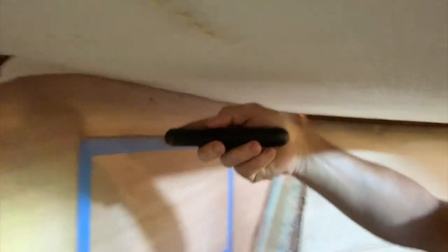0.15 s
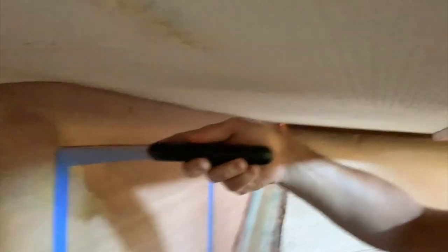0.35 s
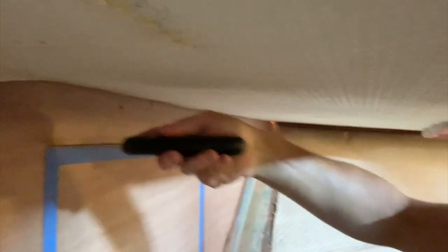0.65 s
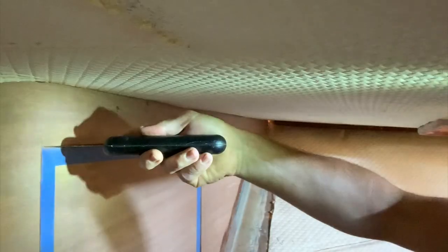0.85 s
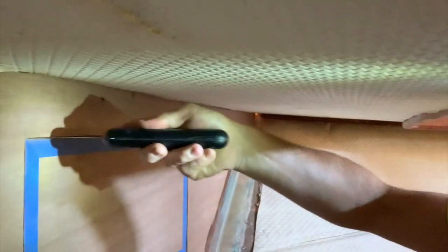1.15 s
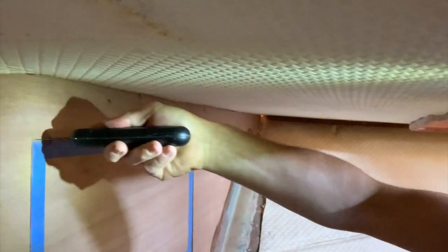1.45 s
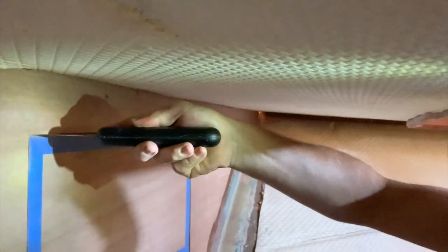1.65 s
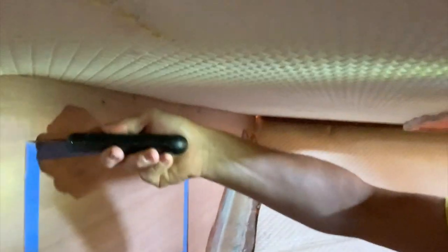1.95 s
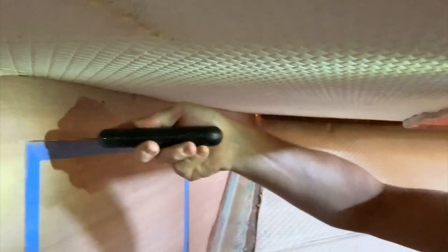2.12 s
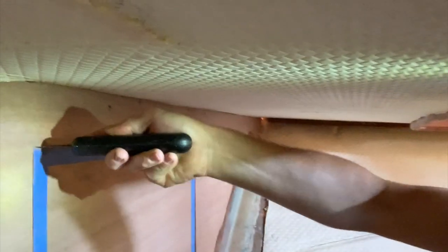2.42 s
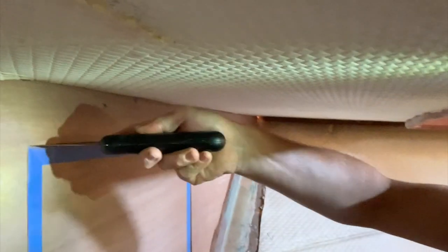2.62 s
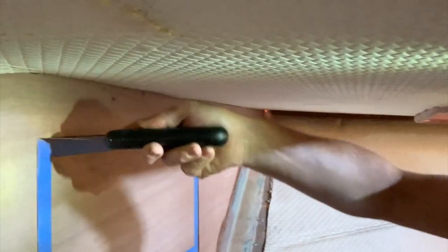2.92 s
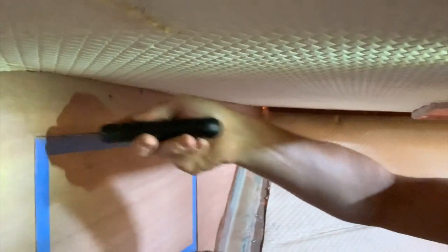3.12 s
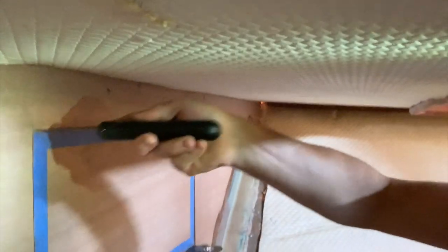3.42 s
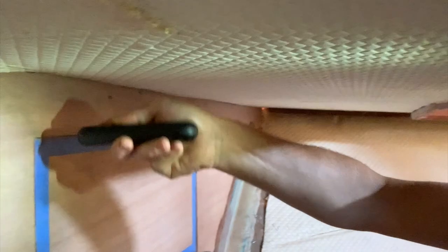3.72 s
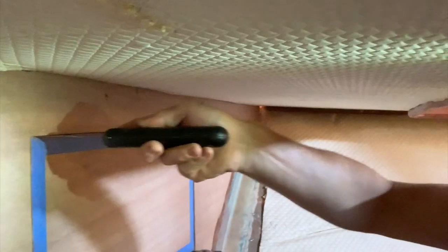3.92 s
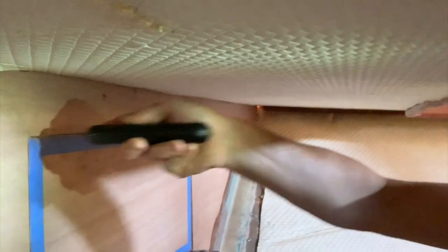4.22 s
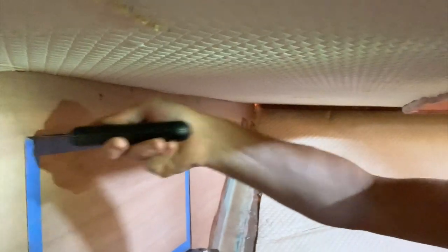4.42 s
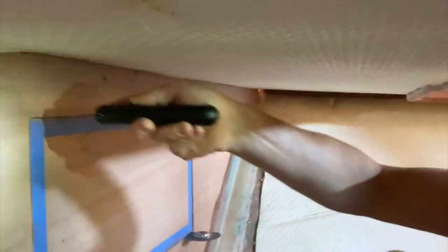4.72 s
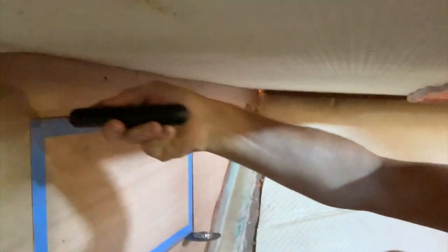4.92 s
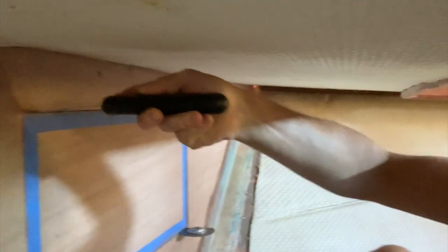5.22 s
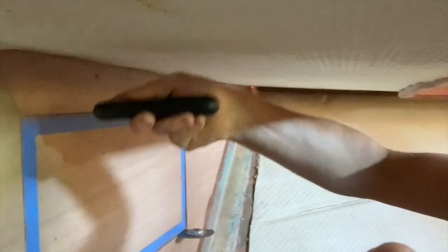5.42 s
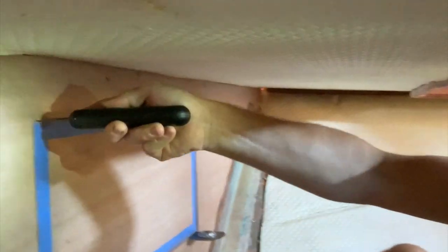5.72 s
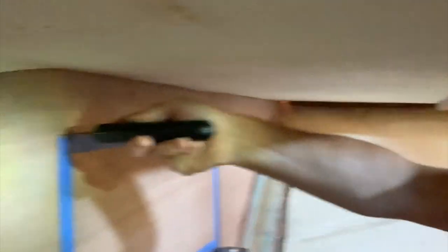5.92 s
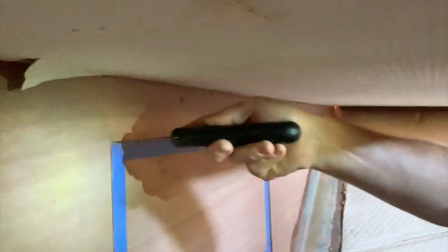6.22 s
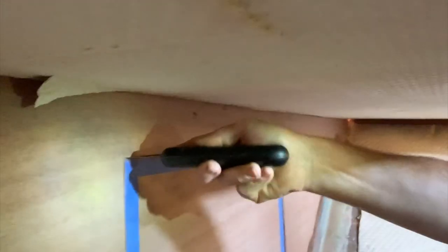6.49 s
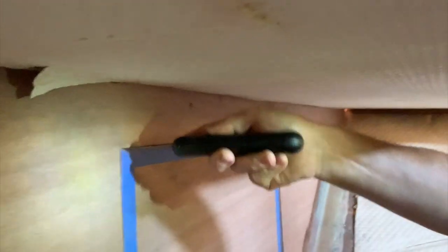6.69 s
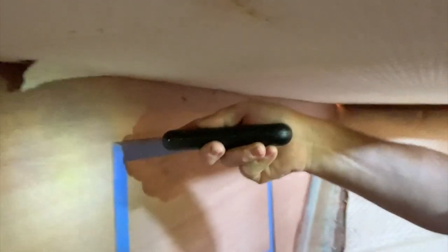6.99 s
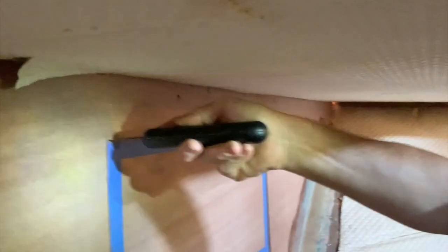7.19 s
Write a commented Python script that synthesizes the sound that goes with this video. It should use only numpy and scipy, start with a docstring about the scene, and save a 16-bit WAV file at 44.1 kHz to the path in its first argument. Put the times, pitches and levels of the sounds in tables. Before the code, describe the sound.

Close, dry sound of sawing wood by hand: soft tentative rubs first, then steady strokes about four or five a second, each a grainy burst of tooth knocks and torn fibres making the panel boom. There is a short gap with a small tick, a denser rapid run, a weaker slow drag, then firm strokes again. Uneven bass rumble and faint background noise lie beneath, with very short cabin reflections.

```python
"""A low hull hum over a faint noise floor, then a hand saw working to and fro through a cabin's wooden bulkhead.
The hum is a wandering sine that jolts of the arm swell. Passing teeth knock the wood at a rate that follows
the blade's speed and ring the panel's modes; torn fibres rasp and the blade hisses, both as shaped noise.
Friction dips as the blade sticks and leaps as it lets go; small contacts tick and some turns of the blade squeal."""
import sys
import numpy as np
from scipy import signal
from scipy.fft import rfft, irfft
from scipy.io import wavfile
from scipy.ndimage import uniform_filter1d

SR = 44100
rng = np.random.default_rng(int(sys.argv[2]) if len(sys.argv) > 2 else 0)


def unload_wav(signal):
    """Save mono or channel-first audio to the path in sys.argv[1] as 16-bit WAV at rate SR, clipped to [-1, 1]."""
    wavfile.write(
        sys.argv[1],
        SR,
        np.round(np.clip(np.atleast_2d(signal).T, -1, 1) * 32767).astype(np.int16),
    )


def natural_amplitude(level_db):
    """Convert a level in decibels to a linear amplitude factor, elementwise."""
    exponent = np.asarray(level_db, float) / 20
    return 10 ** exponent


N = 324135

# The saw strokes. Each row: start in seconds, hardest point in seconds, end in seconds, top tooth rate in Hz
# before wobble, rasp level in dB, tooth knock level in dB; both levels before the fades at the turns.
STROKE_TABLE = [(0.063, 0.225, 0.3, 109.6, -35.0, -27.5), (0.493, 0.583, 0.74, 124.9, -43.5, -33.5),
                (0.627, 0.756, 0.91, 124.9, -43.5, -29), (0.876, 1.041, 1.17, 399.9, -41, -28),
                (1.129, 1.371, 1.567, 189.8, -37.5, -20), (1.506, 1.607, 1.718, 219.7, -22.5, -13),
                (1.713, 1.87, 1.958, 225.0, -32, -13.5), (1.994, 2.029, 2.214, 259.7, -25, -13),
                (2.183, 2.397, 2.505, 210.8, -33.5, -15.5), (2.466, 2.552, 2.686, 239.3, -24.5, -14),
                (2.674, 2.724, 2.93, 89.8, -49, -35), (2.986, 3.011, 3.11, 109.6, -32, -20),
                (3.125, 3.17, 3.345, 301.2, -29.5, -13), (3.354, 3.428, 3.562, 229.8, -26.3, -14.9),
                (3.559, 3.581, 3.776, 261.0, -29, -15), (3.766, 3.813, 3.97, 279.9, -25.5, -15),
                (3.956, 4.104, 4.194, 340.0, -27.5, -18), (4.189, 4.264, 4.381, 359.0, -22.5, -10.5),
                (4.38, 4.437, 4.548, 387.5, -24.5, -10.5), (4.571, 4.655, 4.735, 200.1, -20.5, -10.5),
                (4.746, 4.845, 4.97, 188.8, -28.9, -16.5), (4.95, 5.028, 5.19, 211.1, -25.5, -17.1),
                (5.272, 5.306, 5.326, 90.1, -23, -23), (5.381, 5.67, 5.91, 159.9, -38, -20.5),
                (5.927, 6.011, 6.247, 394.0, -35, -17.5), (6.228, 6.368, 6.49, 238.5, -32.5, -16),
                (6.53, 6.564, 6.725, 194.7, -26.5, -10), (6.723, 6.827, 6.905, 261.0, -28.5, -13.5),
                (6.935, 7.007, 7.134, 240.1, -26, -12.5), (7.13, 7.19, 7.306, 230.3, -28.5, -11.7),
                (7.326, 7.359, 7.492, 240.6, -14, -5.5)]


def rms_one(x):
    """Scale to unit rms."""
    return x / np.sqrt(np.mean(x ** 2) + 1e-20)


def drift(rate_hz):
    """Slow random movement, spread 1: white noise through two equal one-pole lowpasses."""
    r = np.exp(-2 * np.pi * rate_hz / SR)
    settled = signal.lfilter([1], [1, -2 * r, r * r], rng.standard_normal(N + SR))[SR:]
    return rms_one(settled)


def coloured(x, spectrum):
    """Shape a noise with a spectrum drawn in dB over log frequency; rms 1."""
    hz, db = np.transpose(spectrum)
    grid_hz = np.maximum(np.arange(N // 2 + 1) * SR / N, 1)
    gain_db = np.interp(np.log(grid_hz), np.log(hz), db, left=-90, right=-90)
    return rms_one(irfft(rfft(x) * natural_amplitude(gain_db), N))


def resonance(x, hz, width_hz):
    """Two-pole resonance, gain 1 on top."""
    r = np.exp(-np.pi * width_hz / SR)
    feedback = [1, -2 * r * np.cos(2 * np.pi * hz / SR), r * r]
    return signal.lfilter(np.array([1, 0, -1]) * (1 - r * r) / 2, feedback, x)


def background():
    """A faint steady noise floor, heaviest in the bass."""
    # Spectrum of the floor. Each row: frequency in Hz, relative density in dB per Hz.
    floor_spectrum = [(47, -26), (80, 9), (409, -34), (477, -34), (2980, -41), (5640, -57), (12200, -50),
                      (15600, -67)]
    floor_db = -45
    return natural_amplitude(floor_db) * coloured(rng.standard_normal(N), floor_spectrum)


def boom(boom_hz=50.6, hum_db=-41.5, wander=0.2, lumpy_db=3.0):
    """The hull hums low all the time, its pitch wandering and its level uneven; each jolt swells it."""
    # The arm's jolts, which shake the hull. Each row: time of the peak in seconds, swell in dB before lumpiness.
    jolts = [(.15, -33.5), (.26, -28.5), (.62, -33), (.84, -29.5), (1.08, -33), (1.31, -31), (1.56, -20.5),
             (1.69, -21), (1.88, -29), (2.03, -29), (2.27, -27), (2.52, -24), (2.67, -23.5), (2.77, -26.5),
             (3.07, -20.5), (3.32, -26.5), (3.57, -23.5), (3.73, -23.5), (3.93, -22), (4.05, -26),
             (4.36, -24), (4.55, -33), (4.74, -29), (4.9, -28), (5.09, -23), (5.29, -29.5), (5.45, -27.5),
             (5.6, -25), (5.72, -32), (5.87, -27), (5.98, -26), (6.16, -33), (6.32, -29), (6.47, -25),
             (6.59, -25), (6.9, -25.5), (7.11, -28), (7.28, -28)]
    rise_s, fall_s = 0.037, 0.049
    t = np.arange(0, N + 64, 64) / SR
    s, db = np.transpose(jolts)[:, :, None]
    swells = natural_amplitude(db) * np.exp(-((t - s) / np.where(t < s, rise_s, fall_s)) ** 2)
    level = np.interp(np.arange(N) / SR, t, natural_amplitude(hum_db) + swells.sum(axis=0))
    phase = 2 * np.pi * np.cumsum(boom_hz * (1 + wander * drift(8.98))) / SR
    return level * natural_amplitude(lumpy_db * drift(28)) * np.sqrt(2) * np.sin(phase)


def panel(force):
    """The bulkhead answers a force with all its modes, in alternating polarity."""
    # Modes of the wood. Each row: frequency in Hz, bandwidth in Hz, gain in dB.
    modes = [(68.6, 31, -13.5), (102.3, 19.5, -2.5), (120, 19.4, -1), (182.2, 9.4, 1), (229.2, 13.8, -2.5),
             (290, 15.3, -6.5), (331.4, 13.1, -3), (389, 23.5, -7.5), (412.2, 24, -14), (491, 24, -17.5),
             (525.7, 12.6, -14.5), (621.5, 13.7, -19), (680, 32, -40.5), (781, 22, -21), (852.8, 12, -25),
             (1048, 26, -23.5), (1142, 26, -23.5), (1266, 41, -26), (1482, 38, -24.5), (1723, 57, -28.5),
             (1883, 38, -32), (2240, 60, -52), (2437, 76, -26.5), (2972, 90, -26), (3743, 68, -29.5),
             (4064, 130, -32), (4640, 160, -34)]
    ringing = 0
    for k, (hz, width_hz, db) in enumerate(modes):
        ringing = ringing + (-1) ** k * natural_amplitude(db) * resonance(force, hz, width_hz)
    return ringing


def stroke_motion(roundness=.6, creep_hz=35):
    """The arm speeds the blade up and slows it down in every stroke: tooth rate in Hz and knock sharpness."""
    fastest_at = .45   # share of the stroke gone when the blade is fastest
    sharpness_at_250_hz, sharper_per_hz = 0.36, 0.0031   # faster teeth knock sharper
    t, rate = np.arange(N) / SR, np.full(N, float(creep_hz))
    for start, _, end, top_hz, *_ in STROKE_TABLE:
        fastest = start + fastest_at * (end - start)
        turn = np.interp(t, [start, fastest, end], [0, np.pi / 2, np.pi])
        rate = np.maximum(rate, top_hz * np.abs(np.sin(turn)) ** roundness)
    return rate, np.clip(sharpness_at_250_hz + sharper_per_hz * (rate - 250), 0, 1)


def stroke_levels():
    """Every stroke fades in after the turn, leans to its hardest point and fades out: rasp and knock in dB."""
    turn_db, attack_s, release_s = 31, 0.024, 0.043   # fade at each turn of the blade, and its time constants
    lean_db, lean_power = 10, 1.29   # pressure lost from the hardest point to either end
    knock_follows = 0.62   # share of the stroke's swing in dB that the knocks take
    rest_rasp_db, rest_knock_db = -65, -53.5   # the blade still rubs faintly between strokes
    step = 64
    t = np.arange(0, N + step, step) / SR
    start, hardest, end, _, rasp_db, knock_db = np.transpose(STROKE_TABLE)[:, :, None]
    away_before = (hardest - t) / (hardest - start)
    away_after = (t - hardest) / np.maximum(end - hardest, .01)
    away = np.where(t < hardest, away_before, away_after)
    fade_in = np.exp(np.minimum((start - t) / attack_s, 3))
    fade_out = np.exp(np.minimum((t - end) / release_s, 3))
    shape_db = -turn_db * (fade_in + fade_out) - lean_db * away ** lean_power
    rasp_power = np.sum(natural_amplitude(rasp_db + shape_db) ** 2, axis=0) + natural_amplitude(rest_rasp_db) ** 2
    knock_power = np.sum(natural_amplitude(knock_db + knock_follows * shape_db) ** 2, axis=0) + natural_amplitude(rest_knock_db) ** 2
    return [np.interp(np.arange(N) / SR, t, 10 * np.log10(p)) for p in (rasp_power, knock_power)]


def slips():
    """Gain in dB: friction falls quiet while the blade sticks and jumps up as it lets go."""
    # Moments when the blade breaks free. Each row: time in seconds, scale of the dip and jump in dB.
    releases = [(0.123, 9.5), (.19, 9.5), (.53, 5), (1.321, 2), (2.502, 5), (3.01, 2), (3.368, 7),
                (3.787, 1), (4.415, 0), (5.411, 9), (6.547, 1), (7.329, 10)]
    stick_s, settle_s, overshoot = .028, .018, .35
    t, db = np.arange(N) / SR, np.zeros(N)
    for s, jump_db in releases:
        before = -np.exp(-np.abs(t - s) / stick_s)
        after = overshoot * np.exp(-np.abs(t - s) / settle_s)
        db += jump_db * np.where(t < s, before, after)
    return uniform_filter1d(db, size=130)    # letting go takes a few milliseconds


def teeth(wobble=.05, uneven_db=4.5, judder_db=2.0, grind=0.77, blunt_hz=350, sharp_hz=1000):
    """One knock per passing tooth, uneven in size and spacing, over a grinding force; returns force and bite."""
    rate, sharpness = stroke_motion()
    passed = np.cumsum(rate * (1 + wobble * drift(40))) / SR
    knocks = np.diff(np.floor(passed), prepend=0) * natural_amplitude(uneven_db * rng.standard_normal(N))
    knocks *= np.sqrt(SR / rate)     # the same power at every speed
    force = (knocks + grind * rng.standard_normal(N)) * natural_amplitude(judder_db * drift(35.5))
    blunt = signal.sosfilt(signal.butter(2, blunt_hz, fs=SR, output="sos"), force)
    sharp = signal.sosfilt(signal.butter(2, sharp_hz, fs=SR, output="sos"), force)
    bite = np.cos(2 * np.pi * passed)
    return blunt + sharpness * (sharp - blunt), bite


def saw(bite_db=2.0, flutter_db=1.0, burst_db=0.87, tilt_hz=900, slip_share=0.95, hiss_db=-15.5):
    """Tooth knocks and torn fibres drive the panel; the blade's flanks hiss. Returns knock and friction."""
    # Colour of the torn fibres. Each row: frequency in Hz, relative density in dB per Hz.
    rasp_spectrum = [(260, -52), (450, 0), (616, -1), (908, -10.5), (1080, -9.5), (1370, -21),
                     (2140, -13.5), (5500, -40), (7150, -46), (12100, -120)]
    # Colour of the blade in the kerf. Each row: frequency in Hz, relative density in dB per Hz.
    hiss_spectrum = [(2650, -5), (4500, -3), (5830, -8.5), (8220, -7.5), (8840, -9), (9550, -8),
                     (11600, -9.5), (12600, -8.5), (15600, -19)]
    rasp_db, knock_db = stroke_levels()
    slip_db = slips()
    force, bite = teeth()
    knock = panel(force * natural_amplitude(knock_db + slip_share * slip_db)) / np.std(panel(force))
    # fibres tear hardest as a tooth bites, and in uneven bursts
    pulse_db = bite_db * bite + flutter_db * drift(23) + burst_db * drift(82)
    friction_gain = natural_amplitude(rasp_db + slip_db + pulse_db)
    highpass = signal.butter(4, 480, "high", fs=SR, output="sos")
    tearing = signal.sosfilt(highpass, rng.standard_normal(N))
    tearing = signal.lfilter([1], [1, -np.exp(-2 * np.pi * tilt_hz / SR)], tearing)
    rung = panel(tearing * friction_gain) / np.std(panel(tearing))
    rasp = coloured(rng.standard_normal(N), rasp_spectrum) * friction_gain
    hiss = coloured(rng.standard_normal(N), hiss_spectrum) * friction_gain * natural_amplitude(hiss_db)
    return knock, rung + rasp + hiss


def snaps(body_db=12.0):
    """Small contacts: bursts of noise in a band, dying away, with the panel's answer to them."""
    # The contacts. Each row: start in seconds, peak of the bare burst in dB, centre in Hz, width in octaves,
    # decay to 1/e in seconds.
    contacts = [(0.4286, -56, 2990, 3.5, 0.0038), (2.72, -39, 3019, 3.34, 0.0044),
                (2.8423, -21, 2999, 3.9, 0.003), (2.939, -48, 3000, 3.1, 0.0039),
                (5.2885, -56, 3007, 4.7, 0.004)]
    ticks, size = np.zeros(N), round(.1 * SR)
    for s, db, hz, octaves, decay_s in contacts:
        edges = [hz * 2 ** (-octaves / 2), min(hz * 2 ** (octaves / 2), .45 * SR)]
        burst = rng.standard_normal(size) * np.exp(-np.arange(size) / (decay_s * SR))
        burst = signal.sosfilt(signal.butter(2, edges, "band", fs=SR, output="sos"), burst)
        ticks[round(s * SR):round(s * SR) + size] += natural_amplitude(db) * burst / np.abs(burst).max()
    return ticks + natural_amplitude(body_db) * panel(ticks)


def squeals(width_hz=200):
    """The blade squeals as it turns: noise twice through a resonance, swelling and fading."""
    # The squeals. Each row: start in seconds, end in seconds, pitch in Hz, rms level at the top of the swell in dB.
    squeal_rows = [(.47, .54, 1300, -65), (.82, .97, 2150, -66), (.88, .95, 1100, -57)]
    t, out = np.arange(N) / SR, np.zeros(N)
    for start, end, hz, db in squeal_rows:
        tone = resonance(resonance(rng.standard_normal(N), hz, width_hz), hz, width_hz)
        swell = np.sin(np.interp(t, [start, end], [0, np.pi]))
        out += natural_amplitude(db) * rms_one(tone) * swell
    return out


def cabin(x, t60_s=0.1, reflections_db=-6.5, wall_cut_hz=11000):
    """Dense close reflections that die fast: a decaying noise tail, dulled by the walls, added to the source."""
    t = np.arange(round(.3 * SR)) / SR
    tail = rng.standard_normal(len(t)) * natural_amplitude(-60 * t / t60_s) * (t > .002)
    tail = signal.lfilter([1], [1, -np.exp(-2 * np.pi * wall_cut_hz / SR)], tail)
    tail = tail / np.sqrt(np.sum(tail ** 2))
    return x + natural_amplitude(reflections_db) * signal.fftconvolve(x, tail)[:N]


def scene():
    """Noise floor, hull and tooth knocks stay dry; friction, contacts and squeals get the cabin's reflections."""
    floor = background()
    hull = boom()
    knock, friction = saw()
    in_cabin = cabin(friction + snaps() + squeals())
    return (floor + hull + knock + in_cabin)[None]


def low_pass(x):
    """Removes everything above the highest recorded frequency."""
    return signal.sosfilt(signal.butter(12, 15710, fs=SR, output="sos"), x)


def record(dry):
    """The microphone loses the deepest bass, and peaks are rounded off."""
    low_cut_hz, top = 42, .65   # top: the amplitude that peaks approach
    mix = signal.sosfilt(signal.butter(3, low_cut_hz, "high", fs=SR, output="sos"), dry)
    mix = top * np.tanh(mix / top)
    return low_pass(mix)


dry = scene()
out = record(dry)
unload_wav(out)
```